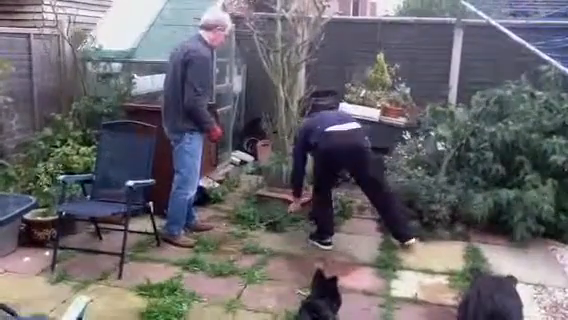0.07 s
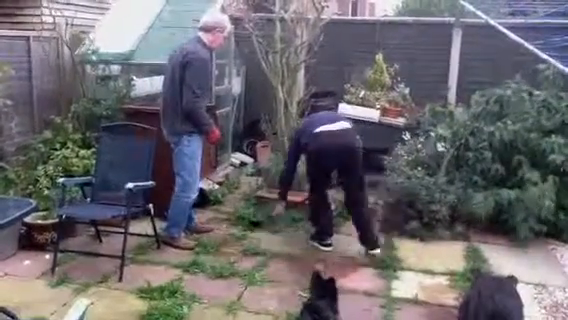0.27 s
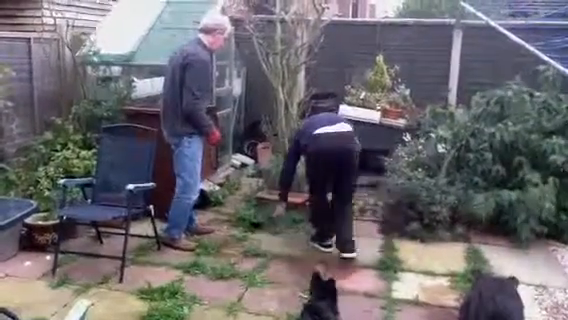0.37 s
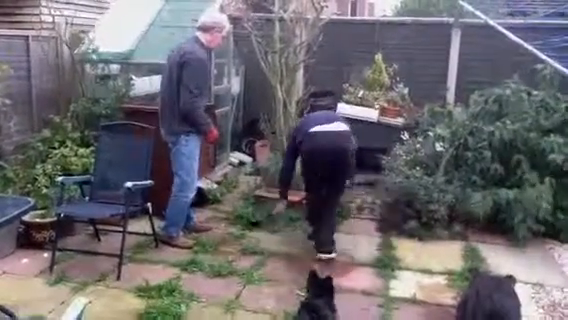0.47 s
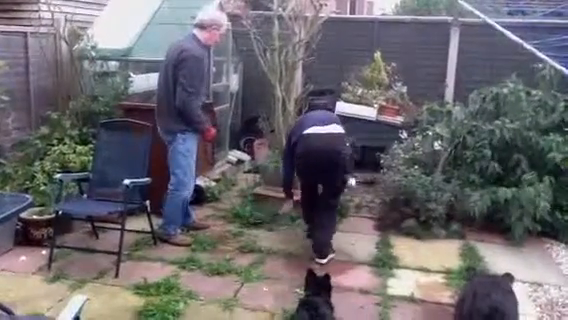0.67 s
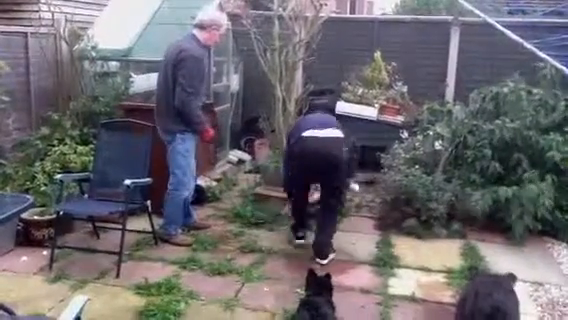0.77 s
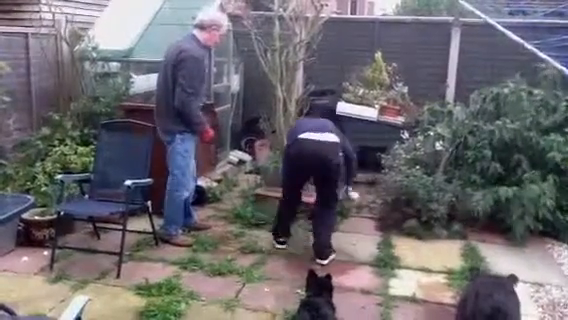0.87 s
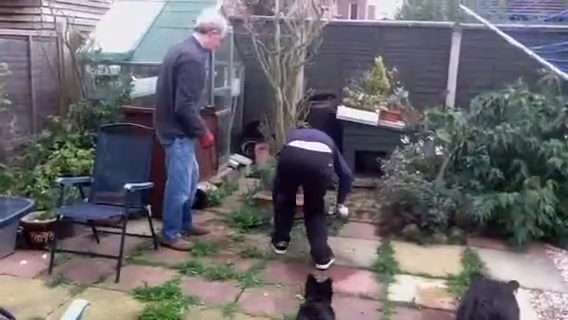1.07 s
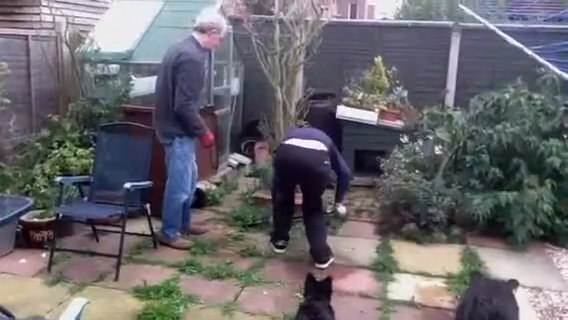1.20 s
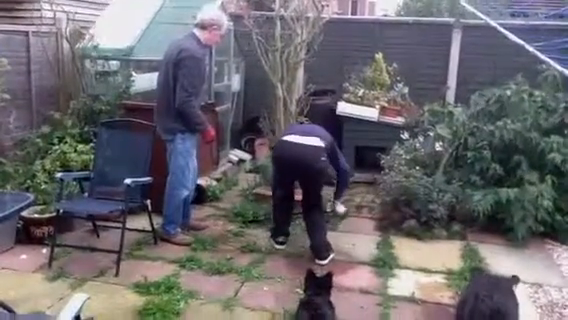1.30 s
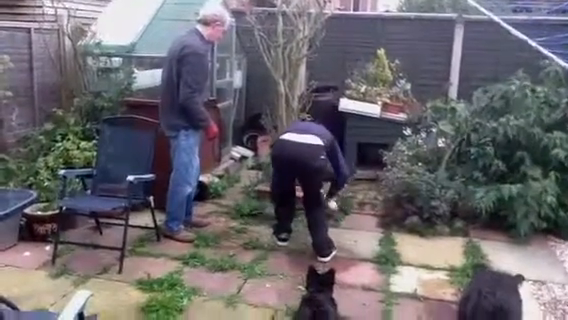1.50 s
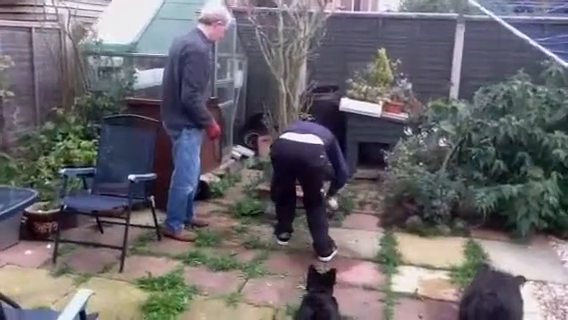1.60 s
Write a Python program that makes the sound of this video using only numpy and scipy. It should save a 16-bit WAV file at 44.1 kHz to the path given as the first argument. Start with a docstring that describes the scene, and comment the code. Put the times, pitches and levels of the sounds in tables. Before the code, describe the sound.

A steel hand tool scrapes across paving stones in short strokes, with one hard knock.

```python
"""A steel hand tool scraped over paving in a small fenced garden, on one small microphone.
Over quiet air comes one long stroke, grit catching under the edge and ringing the blade. Soft low
bumps, probably handling, start close to the microphone and come and go. The edge sings briefly, the
tip clinks, and shorter strokes follow, the blade ticking down between them. Just past one second it
knocks hard on a slab; light scrapes of the tip finish. The fences throw back short echoes throughout."""
import sys
import numpy as np
from scipy import signal
from scipy.fft import rfft, irfft
from scipy.io import wavfile

SR = 44100
rng = np.random.default_rng(int(sys.argv[2]) if len(sys.argv) > 2 else 0)


def dump(signal):
    """Clip the signal to [-1, 1] and save it as 16-bit WAV at the path in sys.argv[1]."""
    limited = np.clip(np.atleast_2d(signal).T, -1, 1)
    pcm = np.round(limited * 32767).astype(np.int16)
    wavfile.write(sys.argv[1], SR, pcm)


N = 72765
TIME = np.arange(N) / SR
FREQS = np.maximum(np.fft.rfftfreq(2 * N, 1 / SR), 1)

# broad colour of grinding grit: (frequency [Hz], relative level [dB])
GRIT_SPECTRUM = [(150, -14), (350, -10), (550, -7), (1000, -9), (1800, -6), (2500, -7.5), (4000, -8.5),
                 (6000, -5.5), (9500, -9.5), (11000, -12), (15000, -17.5)]


def from_db(db):
    """Decibels to gain."""
    return 10 ** (np.asarray(db) / 20)


def unit_rms(x):
    """Scale to unit rms."""
    return x / np.sqrt(np.mean(x ** 2) + 1e-20)


def gains(points):
    """Gain at every frequency from (frequency [Hz], level [dB]) points."""
    hz, db = np.transpose(points)
    return from_db(np.interp(np.log(FREQS), np.log(hz), db))


def colour(x, gain):
    """Causal (minimum-phase) filter with the given gain per frequency."""
    cepstrum = irfft(np.log(gain + 1e-9))
    cepstrum[1:N] *= 2
    cepstrum[N + 1:] = 0
    return irfft(rfft(x, 2 * N) * np.exp(rfft(cepstrum)))[:N]


def noise(spectrum):
    """Steady coloured noise of unit rms."""
    return unit_rms(colour(rng.standard_normal(N), gains(spectrum)))


def drift(rate_hz):
    """Random wander of unit rms, mostly slower than the given rate."""
    pole = np.exp(-2 * np.pi * rate_hz / SR)
    return unit_rms(signal.lfilter([1], [1, -2 * pole, pole * pole], rng.standard_normal(N)))


def decay(start, t60):
    """Envelope that jumps to one and falls 60 dB in t60 seconds."""
    return (TIME >= start) * from_db(-60 * np.maximum(TIME - start, 0) / t60)


def struck(start, modes):
    """Modes set ringing at one moment, neighbours in opposite sense."""
    return sum((-1) ** k * from_db(db) * decay(start, t60) * np.sin(2 * np.pi * hz * (TIME - start))
               for k, (hz, db, t60) in enumerate(modes))


def garden_air():
    """The quiet, steady background of the garden, mostly low."""
    # colour of the air: (frequency [Hz], relative level [dB])
    air_spectrum = [(30, -46), (70, 1.5), (150, 1.5), (340, -5.5), (600, -6.5), (1200, -8.5), (2500, -16),
                    (15500, -23)]
    return from_db(-59) * noise(air_spectrum)


def grains(per_second=12000, spread_db=2.5):
    """Dense clicks of uneven size from grit breaking under the edge."""
    sizes = from_db(spread_db * np.minimum(rng.exponential(1, N), 4))
    signs = rng.choice([-1, 1], N)
    breaks = rng.random(N) < per_second / SR
    return unit_rms(sizes * signs * breaks)


def blade_response(contact, ring_db):
    """Gain per frequency of grit plus ringing blade, added in power."""
    # blade resonances for each way it meets the stone: (frequency [Hz], width [Hz], relative level [dB])
    resonances = {"flat": [(595.7, 62, 7), (673, 55, 0.5), (790, 32, -9.5), (976, 103, -3),
                  (1135, 55, -5.5), (1447, 92, 0.5), (1620, 130, 1), (2027, 110, 0), (2900, 180, -10),
                  (3235, 200, -3), (4770, 170, -3.5), (5930, 170, -0.5), (6700, 165, 1.5),
                  (7640, 250, -4.5), (8720, 320, -1.5), (9520, 107, -0.5), (11100, 100, -9.5),
                  (10500, 120, -16), (11420, 100, -25), (11700, 84, -21), (13000, 170, -11)],
                  "heel": [(610, 170, -6), (1146, 220, -1), (1480, 100, -10), (1683, 70, -2),
                  (2003, 70, 2.5), (3080, 130, -4.5), (4690, 120, -0.5), (4780, 220, -0.5), (5900, 260, -3),
                  (6640, 120, 1.5), (6780, 92, -5.5), (7780, 130, -6.5), (8180, 140, -10), (8830, 210, 0),
                  (9500, 330, -3), (11020, 110, -1), (12600, 130, -8)], "edge": [(580, 70, 4.5),
                  (1130, 235, 0.5), (1497, 180, 0), (2535, 67, -2), (2840, 150, -2), (4390, 320, -6.5),
                  (5864, 69, 4.5), (6660, 180, -7), (8150, 120, -2), (8670, 210, -6), (10630, 110, -7.5)],
                  "tip": [(1375, 280, -7), (2626, 150, -2), (3071, 61, 5.5), (4685, 99, 1), (5563, 120, 4),
                  (5860, 130, 2.5), (6300, 110, -5), (6790, 59, 1), (7640, 140, -2), (8000, 100, -0.5),
                  (11400, 130, -0.5), (12100, 92, -9), (13390, 130, -7), (13990, 180, -10)]}
    ring_power = sum(from_db(db + ring_db) ** 2 / (1 + (2 * (FREQS - hz) / width) ** 2) ** 2
                     for hz, width, db in resonances[contact])
    return np.sqrt(gains(GRIT_SPECTRUM) ** 2 + ring_power)


def angled(response, tilt_db, body_db, pivot_hz=2180):
    """The angle of the blade makes its response brighter or fuller; unit power."""
    slope_db = tilt_db * np.log2(np.maximum(FREQS, 500) / pivot_hz)
    low_shelf_db = body_db / (1 + (FREQS / pivot_hz) ** 4)
    return unit_rms(response * from_db(slope_db + low_shelf_db))


def scrapes(chatter_db=1.28):
    """Each stroke presses the blade along the stone; the pressure chatters and drives grains into it."""
    # strokes over the paving: (start [s], attack [s], length [s], release [s], first level [dB],
    # last level [dB], tilt [dB/octave], low body [dB], ring [dB], part of the blade in contact)
    strokes = [(0.164, 0.0028, 0.2, 0.033, -32.5, -28.5, 0.5, 1.5, 2, "flat"),
               (.55, 0.012, 0.034, .012, -54, -48, 2, 1, 3, "flat"),
               (0.609, 0.0045, 0.022, 0.037, -48.5, -48, -5, -1, -5, "edge"),
               (0.704, 0.0038, 0.024, 0.0082, -35.5, -40.5, -0.5, 1.5, 3.5, "heel"),
               (0.73, 0.0034, 0.0094, 0.062, -33.5, -31, 1, 2.5, 6.5, "heel"),
               (0.937, 0.0014, 0.031, 0.008, -56, -41, 4.5, 7, 11, "edge"),
               (.974, 0.0038, 0.032, 0.006, -35, -31.5, 0.14, -6, 6.5, "edge"),
               (1.006, 0.0047, 0.055, 0.06, -29.5, -29, 0, -1, 2, "edge"),
               (1.369, 0.022, 0.056, 0.015, -61, -55.5, -1.5, -1, 0, "tip"),
               (1.419, 0.0076, 0.025, 0.05, -38.5, -38, 0.6, 2.5, 6.5, "tip"),
               (1.519, 0.0048, 0.017, 0.022, -49.5, -45, -2, -8, -4, "tip"),
               (1.537, 0.008, 0.055, 0.048, -55.5, -52.5, 2.5, 4, -12, "tip"),
               (1.641, 0.0036, .03, .02, -55.5, -54, .3, -4, -2, "tip")]
    out = np.zeros(N)
    grit = unit_rms(grains() * from_db(chatter_db * drift(rate_hz=46)))
    for start, attack, length, release, first_db, last_db, tilt_db, body_db, ring_db, contact in strokes:
        age = TIME - start
        pressure = np.clip(age / attack, 0, 1) * np.exp(-2 * np.maximum(age - length, 0) / release)
        pressure *= from_db(np.interp(age, [0, length], [first_db, last_db]))
        response = angled(blade_response(contact, ring_db), tilt_db, body_db)
        out += colour(grit * pressure, response)
    return out


def edge_ticks():
    """Brief crunches where the edge touches down or catches."""
    # touches of the edge: (time [s], level [dB], tilt [dB/octave])
    touches = [(.164, -32, 2.5), (.281, -30.5, -1.5), (0.529, -37.5, -1), (.706, -40, -0.5),
               (0.941, -46.5, 2), (1.077, -21, -3), (1.116, -35, -3), (1.181, -37, 0), (1.528, -42.5, 0.5)]
    grit = grains()
    out = np.zeros(N)
    for start, db, tilt_db in touches:
        crunch = grit * from_db(db) * decay(start, t60=0.045)
        out += colour(crunch, angled(gains(GRIT_SPECTRUM), tilt_db, body_db=0))
    return out


def close_bumps(rise_s=0.0066, upper_hz=325.6, upper_db=-15.5):
    """Soft pushes on two well-damped low resonances, probably handling, over a faint rumble."""
    # rumble among the bumps: (frequency [Hz], relative level [dB])
    rumble_spectrum = [(30, -48), (60, -22.5), (110, 1), (180, -7), (280, -11.5), (500, -35), (2000, -63)]
    # bumps close to the microphone: (time [s], level [dB], lower resonance [Hz])
    pushes = [(0.224, -33.5, 167), (0.257, -20.5, 175), (0.327, -31.5, 190), (0.42, -38, 130),
              (0.45, -27.5, 190), (0.475, -35.5, 165), (.492, -33, 127), (.510, -27.5, 173),
              (0.535, -31.5, 184), (0.551, -28.5, 167), (0.583, -33.5, 170), (0.772, -38, 217),
              (0.851, -40, 146), (0.924, -36, 137), (0.941, -38, 157), (0.963, -37.5, 146),
              (0.981, -40, 168), (1.21, -27, 172), (1.225, -31, 178), (1.318, -40, 156), (1.436, -30, 158),
              (1.554, -40, 160), (1.575, -36, 166), (1.619, -37.5, 165)]
    fade_in = np.clip(TIME / 0.17, 0, 1) ** 8
    out = from_db(-53.5) * noise(rumble_spectrum) * fade_in
    for start, db, lower_hz in pushes:
        age = np.maximum(TIME - start, 0)
        swell = (age / rise_s * np.exp(1 - age / rise_s)) ** 4
        lower = np.sin(2 * np.pi * lower_hz * age)
        upper = from_db(upper_db) * np.sin(2 * np.pi * upper_hz * age)
        out += from_db(db) * swell * (lower + upper)
    return out


def edge_squeals(mode_hz=5820, waver_hz=24.3):
    """The edge sticks and sings briefly as one blade mode takes over."""
    # moments of sticking: (middle [s], half-length [s], level [dB])
    sticks = [(1.003, 0.0061, -52), (1.023, 0.0082, -29), (0.274, 0.0063, -32)]
    pitch_hz = mode_hz + waver_hz * drift(rate_hz=87)
    tone = np.sin(2 * np.pi * np.cumsum(pitch_hz) / SR)
    return tone * sum(from_db(db) * np.exp(-((TIME - middle) / half) ** 2) for middle, half, db in sticks)


def tip_taps():
    """The tip clinks on the stone and bounces once."""
    # the tap and its bounce: (time [s], level [dB])
    taps = [(.528, -31), (.566, -48.5)]
    # ring of the tapped tool: (frequency [Hz], relative level [dB], t60 [s])
    modes = [(750, -5.5, 0.048), (967, -11.5, 0.085), (1447, -6, 0.063), (2126, 2.5, 0.027),
             (3605, -6.5, 0.046), (4240, -7, 0.036), (5070, -2, 0.018), (6120, -4, 0.036), (6980, -12, .03)]
    return sum(from_db(db) * struck(start, modes) for start, db in taps)


def slab_knocks():
    """A crack and the ring of tool and slab; a soft contact dulls both."""
    # blows on the slab, one of them hard: (time [s], level [dB], dulled above [Hz])
    blows = [(.922, -38.5, 800), (0.933, -42.5, 900), (1.0769, -15, 12100), (1.0852, -24, 5000),
             (1.112, -27, 5000)]
    # ring of tool and slab: (frequency [Hz], relative level [dB], t60 [s])
    modes = [(306, -6, 0.028), (464, -13, 0.13), (513, -14, 0.14), (653, -1, 0.055), (760, -10, 0.061),
             (1084, -13, 0.14), (1138, -8.5, 0.11), (1488, -25, 0.18), (1675, -16, 0.086),
             (2190, -31, 0.071), (4460, -38, 0.081), (5810, -21, .1), (6250, -9, 0.053), (6640, -25, 0.05),
             (6830, -9.5, 0.08)]
    # colour of the crack: (frequency [Hz], relative level [dB])
    crack_spectrum = [(150, -20.5), (300, -6.5), (450, -3), (650, -1.5), (880, -9.5), (1150, -6),
                      (2000, -16), (4000, -22), (6500, -11), (8500, -21), (15000, -28)]
    crack = from_db(-6.5) * noise(crack_spectrum)
    out = np.zeros(N)
    for start, db, dull_hz in blows:
        knock = struck(start, modes) + crack * decay(start, t60=0.078)
        out += from_db(db) * colour(knock, 1 / (1 + (FREQS / dull_hz) ** 2))
    return out


def with_garden_echoes(direct, tail_db=-6.5, tail_rise_s=0.0059):
    """The direct sound, a few distinct echoes and a short diffuse tail from fences and shrubs."""
    # echoes off the ground and fences: (delay [s], relative level [dB])
    reflections = [(.0115, -15.5), (.027, -17.5), (0.038, -19.5), (.052, -21)]
    # colour of both echoes and tail: (frequency [Hz], gain [dB])
    reflected_spectrum = [(150, -11), (450, -6), (900, -1), (1500, 0.5), (3000, 0.5), (7000, -3),
                          (15000, -2)]
    tail = rng.standard_normal(N) * decay(0, t60=0.3) * (1 - np.exp(-TIME / tail_rise_s))
    tail *= from_db(tail_db) / np.sqrt(np.sum(tail ** 2))
    diffuse = signal.fftconvolve(direct, tail)[:N]
    echoes = sum(from_db(db) * np.interp(TIME - round(delay * SR) / SR, TIME, direct, left=0)
                 for delay, db in reflections)
    return direct + colour(echoes + diffuse, gains(reflected_spectrum))


def scene():
    """The tool out among the fences, dry bumps at the microphone and quiet air, in mono."""
    tool = scrapes() + edge_ticks() + edge_squeals() + tip_taps() + slab_knocks()
    return (with_garden_echoes(tool) + close_bumps() + garden_air())[None]


def record(dry, low_cut_hz=90, top_hz=15350):
    """The small microphone drops the deep bass; the top is cut steeply."""
    low_cut = signal.butter(2, low_cut_hz, "high", fs=SR, output="sos")
    top_cut = signal.ellip(12, .1, 80, top_hz, fs=SR, output="sos")
    return signal.sosfilt(top_cut, signal.sosfilt(low_cut, dry))


dry = scene()
out = record(dry)
dump(out)
```